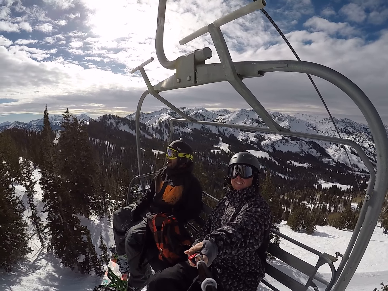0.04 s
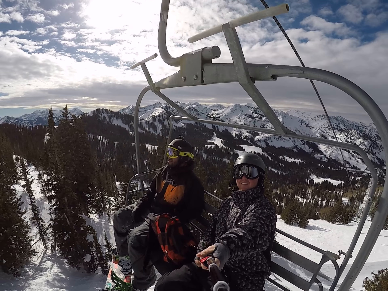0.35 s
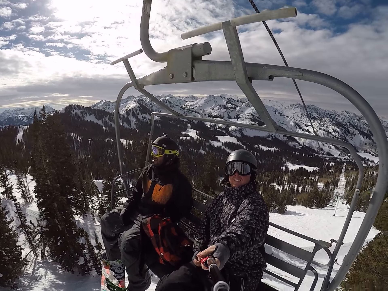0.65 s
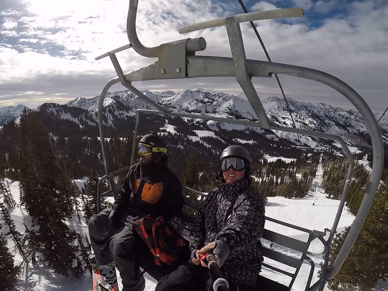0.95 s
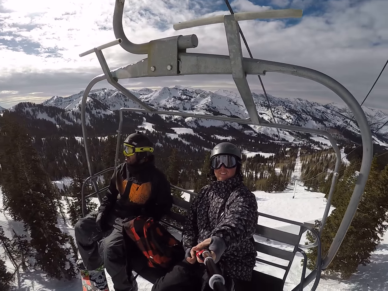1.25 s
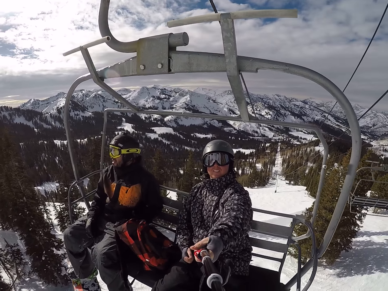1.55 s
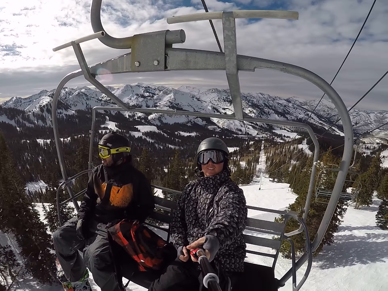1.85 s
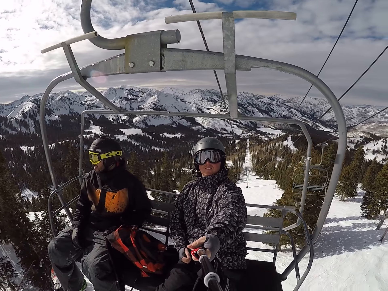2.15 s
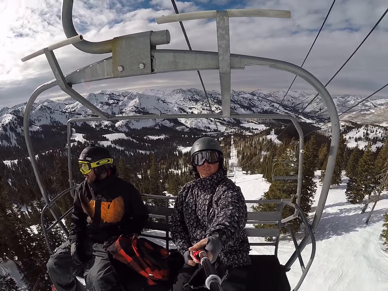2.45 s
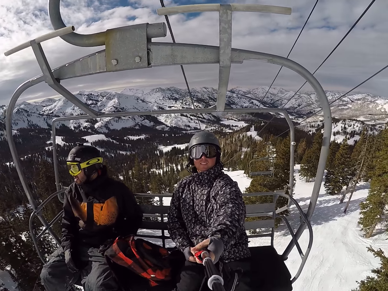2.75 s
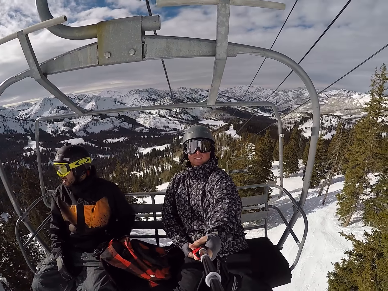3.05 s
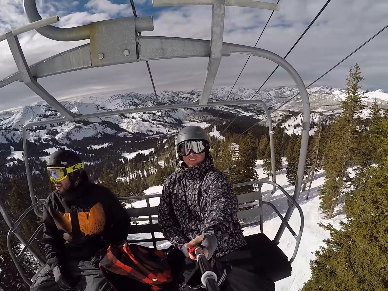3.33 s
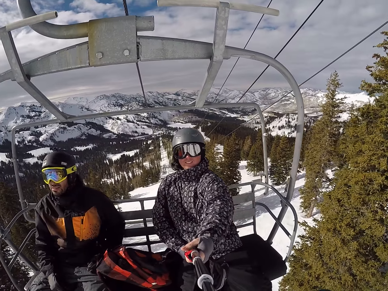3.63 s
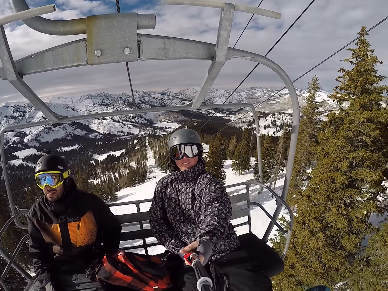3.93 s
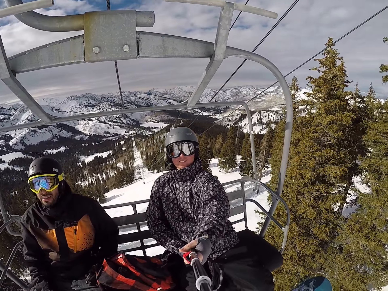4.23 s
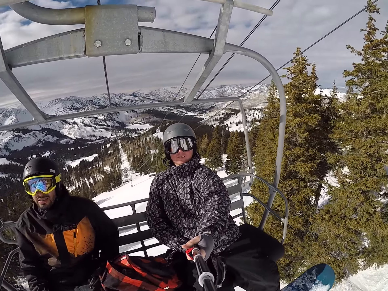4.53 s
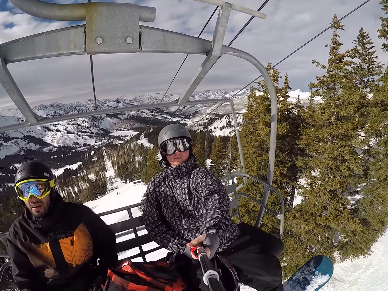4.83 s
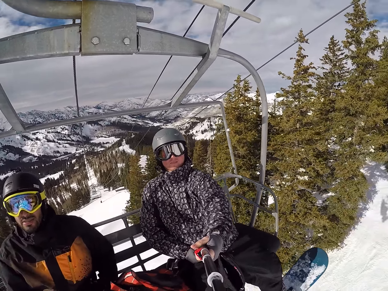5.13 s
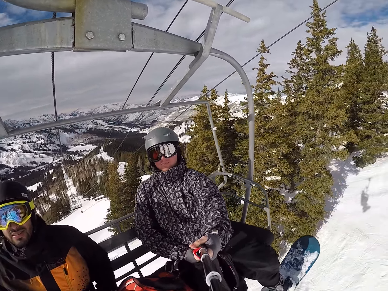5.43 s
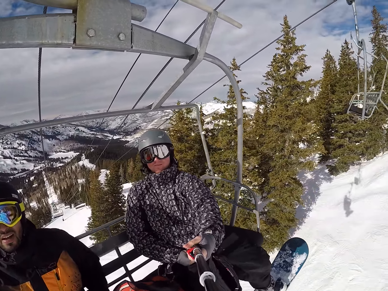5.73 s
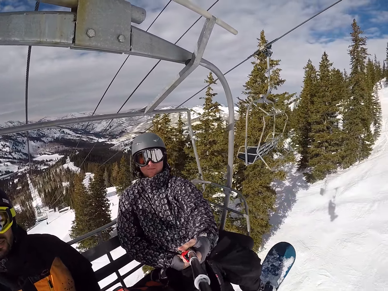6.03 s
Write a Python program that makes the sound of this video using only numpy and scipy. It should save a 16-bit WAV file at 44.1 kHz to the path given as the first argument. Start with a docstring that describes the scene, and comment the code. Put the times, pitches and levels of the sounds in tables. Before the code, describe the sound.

Low, rumbling wind on a chairlift microphone dies down to light clothing rustles, then returns in hard, choppy gusts.

```python
"""A camera on a pole rides a chairlift through a mountain wind.
At first a breeze sweeps eddies over its two microphone ports, while ski jackets swish and tick.
By 2 s the wind has died down, and cloth rubbing on cloth stands out in the lull.
From 4 s hard gusts return, with hoarse rips off the port edges and thuds from the camera body.
Throughout lie the deep rumble of large eddies, the hiss of open air and a thin electronic whine."""
import sys
import numpy as np
from scipy import signal
from scipy.fft import rfft, irfft
from scipy.io import wavfile
from scipy.ndimage import uniform_filter1d

SR = 44100
rng = np.random.default_rng(int(sys.argv[2]) if len(sys.argv) > 2 else 0)


def unload_audio(sound):
    """Save the sound as a 16-bit wav file, at the path given as the first command line argument."""
    columns = np.transpose(np.atleast_2d(sound))
    # keep every value between -1 and 1, then stretch to whole-number steps
    steps = np.round(np.clip(columns, -1, 1) * 32767)
    wavfile.write(sys.argv[1], SR, steps.astype(np.int16))


N = 276948
TIME, HZ = np.arange(N) / SR, np.fft.rfftfreq(N, 1 / SR)
BREEZE_DB = -29.5  # reference strength of the flow
SPLIT = np.array([[.5], [-.5]])  # shares a difference between left and right

# airflow over the ports, a breeze, a lull, a hard blow: (time [s], strength [dB])
FLOW_STRENGTH = [(0, -30.5), (0.35, -30), (0.6, -34), (0.75, -31.5), (1.1, -32.5), (1.55, -35.5),
                 (1.85, -40.5), (2.7, -44), (3.6, -42), (4.0, -44), (4.3, -41), (4.65, -36), (4.9, -32.5),
                 (5.1, -32.5), (5.35, -28), (5.8, -30.5), (6.1, -29), (6.28, -35)]
# likeness of airborne sound at the two ports: (frequency [Hz], correlation [clipped to -1..1])
AIRBORNE_CORRELATION = [(100, 16), (350, 0.3), (600, 0.18), (900, -0.32), (1300, -0.05), (1800, 0.3),
                        (2600, 0.34), (3700, 1), (5500, 0.5), (9000, -0.09)]
# phase difference of airborne sound between the ports: (frequency [Hz], left lead [rad])
AIRBORNE_PHASE = [(400, 0.28), (900, 0.05), (1300, -0.2), (1800, -0.7), (2700, -0.5), (4000, -1),
                  (6000, -1.37), (9000, -3.5)]


def buffeting(level_db=-1.5, breeze_corner_hz=376, quickening=0.78, sharpening=0.073, build_turns=1.75):
    """Convected turbulence: a stronger flow presses harder and sweeps faster eddies past the ports."""
    # single gusts: (time [s], added strength [dB], half-length [s], left minus right [dB])
    gusts = [(0.024, 4, 0.032, 1), (0.731, 5, 0.036, 9.5), (0.877, 3, 0.016, 12), (0.946, 1, 0.021, 11),
             (1.09, 2.5, 0.0073, 10), (1.142, 7, 0.037, 10), (1.392, 2.5, 0.028, 0.5),
             (1.676, 6.5, 0.037, 10.5), (2.198, -3.5, 0.033, 18), (2.405, 6.5, 0.011, 10),
             (3.936, 6, 0.027, 2), (4.039, 15, 0.0083, 16), (4.134, 7.5, 0.036, -8),
             (4.205, 9.5, 0.028, 12), (4.411, 12.5, 0.025, 8.5), (4.51, 12.5, 0.012, 8.5),
             (4.555, 10.5, 0.012, -2), (4.635, 3.5, 0.011, 6), (4.742, 6.5, 0.01, -3),
             (4.82, 5, 0.041, 2.5), (4.894, 6.5, 0.02, 7), (4.955, 1.5, 0.0088, 1.5),
             (4.98, 9, 0.023, -6.5), (5.019, 13, 0.0075, -1.5), (5.274, 5, 0.022, 2),
             (5.356, 4.5, 0.015, 9), (5.417, 4.5, 0.012, -2), (5.513, 3.5, 0.0054, -9),
             (5.594, 4, 0.012, -4), (5.626, 5, 0.0044, 11), (5.638, 6.5, 0.0062, -3.5),
             (5.671, 4, 0.0068, -3.5), (5.692, 2.5, 0.007, 7), (5.702, 6.5, 0.0064, -6),
             (5.771, 6, 0.009, -11), (5.839, 7.5, 0.0041, -22), (5.859, 7, 0.0049, -9),
             (5.902, 7, 0.0069, 7), (5.977, 7.5, 0.0057, -14), (6.084, 8, 0.046, 4), (6.135, 7, 0.0052, -2),
             (6.204, 11, 0.014, 5.5)]
    # brief slack in the flow: (time [s], added strength [dB], half-length [s])
    lulls = [(0.61, -3.5, 0.011), (1.327, -2.5, 0.015), (1.497, -3.5, 0.049), (4.67, 0, 0.014),
             (5.052, -3, 0.053), (5.812, -4.5, 0.014), (5.938, -2.5, 0.016)]
    # eddies get heavier as the camera swings into the flow:
    # (time [s], slope [dB/octave], frequency of the slowest eddies [Hz])
    heading = [(0, -2, 140), (1.1, -0.2, 82), (2.2, -4, 64), (3.5, 1.5, 80), (4.4, -2.5, 53.3),
               (6.28, -1.5, 57)]
    # the ports share slow eddies in step, faster ones opposed: (frequency [Hz], correlation [-1..1])
    port_correlation = [(60, 0.33), (130, 0.42), (250, -0.28), (450, -0.58), (800, -0.94), (1300, -0.64),
                        (2500, 0.36)]
    # balance of the eddies: (frequency [Hz], left minus right [dB])
    port_balance = [(50, -7.5), (90, 2.5), (160, -2), (300, 0), (550, -4.5), (1200, -3.5)]
    # the port muffles the wind, gently to about 560 Hz, then steeply as eddies smaller than its
    # mouth cancel: (frequency [Hz], gain [dB])
    port_response = [(100, 1), (400, -2), (560, -2.5), (800, -5.5), (1130, -10), (1600, -17.5), (2260, -24)]

    gust_db = sum(db * bell(s, length) for s, db, length, _ in gusts)
    lull_db = sum(db * bell(s, length) for s, db, length in lulls)
    slope_db, slowest_hz = follow(heading)
    slope_db = slope_db + sharpening * gust_db
    strength_db = follow(FLOW_STRENGTH)[0] + gust_db + lull_db
    strength_db = strength_db + 0.73 * flutter(22) + 1.33 * flutter(70)  # at both ports alike
    strength_db = strength_db + 0.68 * np.array([flutter(70), flutter(70)])  # at each on its own
    corner_hz = breeze_corner_hz * gain_of(quickening * (strength_db - BREEZE_DB))
    a, b = rfft(rng.standard_normal((2, N))) / np.sqrt(HZ + 1)
    eddies = pair(a, b, read(port_correlation, HZ), read(port_balance, HZ))
    out = 0
    for hz in 25 * 2 ** (np.arange(14) / 2):  # one eddy size every half octave
        triangle = np.maximum(1 - 2 * abs(np.log2((HZ + 1) / hz)), 0)
        band = unit_rms(irfft(eddies * triangle, N))
        band = steadied(band, seconds=0.0068 + 2 / hz, amount=0.55)
        rolloff = 1 / np.sqrt((1 + (hz / corner_hz) ** 3.34) * (1 + (slowest_hz / hz) ** 5))
        # an eddy needs a turn or two to build, so slow ones miss short gusts
        felt_db = uniform_filter1d(strength_db, size=int(build_turns * SR / hz) + 1)
        band_db = felt_db + read(port_response, hz) + slope_db * np.log2(hz / 250)
        out = out + band * rolloff * gain_of(band_db)
    # the flow veers between the ports by chance, and each gust comes from its own side
    veer_db = 1.4 + 4.5 * flutter(8)
    gust_side_db = sum(db * bell(s, 1.5 * length) for s, _, length, db in gusts)
    sides = gain_of((veer_db + gust_side_db) * SPLIT)
    return out * gain_of(level_db) * sides / np.sqrt((sides ** 2).mean(0))


def rips(level_db=-2.0):
    """Flow separation: small, fast eddies break off the port edges in short, hoarse bursts."""
    # bursts: (time [s], half-length [s], relative level [dB], left minus right [dB])
    separations = [(0.734, 0.0071, -21, 3), (1.143, .02, -32, 6), (4.41, 0.0064, -16.5, 5),
                   (4.51, 0.0037, -25, -1), (4.581, 0.0023, -26, -5), (4.809, 0.0099, -19.5, 1),
                   (4.894, .003, -15, 7.5), (4.947, .003, -33, -1), (5.031, 0.0022, -16.5, 0),
                   (5.326, .004, -23, 0), (5.347, 0.012, -21.5, 4), (5.394, 0.0088, -23.5, 3),
                   (5.515, .003, -19.5, -0.5), (5.602, 0.0037, -23, -7), (5.636, .008, -19, -2),
                   (5.695, 0.0034, -27, 8), (5.715, 0.0021, -13.5, -6.5), (5.757, 0.0074, -22, -4.5),
                   (5.773, 0.006, -22, -3), (5.84, 0.004, -19, -1.5), (5.863, 0.0057, -16, -0.5),
                   (5.992, 0.0032, -17.5, -3.5), (6.031, .003, -20, 0), (6.079, 0.0036, -12, 0),
                   (6.105, 0.0028, -10.5, 1), (6.13, 0.0044, -19, 2)]
    # spectrum of a rip: (frequency [Hz], level [dB])
    spectrum = [(100, -34), (250, -4), (420, 5), (620, 3.5), (900, -7), (1250, -19), (1800, -30),
                (4000, -70)]
    colour = gain_of(read(spectrum, HZ) / 2)  # applied twice: for eddy size, then for the muffling port
    eddies = pair(noise(colour), noise(colour), correlation=-0.97)
    eddies = steadied(eddies, seconds=.005, amount=0.32)
    bursts = sum(bell(s, length) * gain_of(db + lean_db * SPLIT)
                 for s, length, db, lean_db in separations)
    return irfft(rfft(eddies * bursts) * colour, N) * gain_of(level_db)


def thuds(wander=.25, slowing=.12):
    """Vortex shedding: the camera sheds a few eddies whose uneven beat slows as the gust passes."""
    # eddy trains: (time [s], half-length [s], frequency [Hz], level [dB], left minus right [dB])
    trains = [(0.749, 0.012, 234, -32, -5), (0.894, 0.0074, 220, -29, 10), (0.957, 0.0065, 220, -28, 10),
              (1.135, 0.035, 209.4, -25.5, 11), (1.688, .01, 140.5, -22, 6), (2.196, 0.0096, 85.3, -25, 5),
              (2.405, 0.0096, 125, -29, 8), (4.411, .004, 485, -27.5, 6), (4.42, 0.011, 235.5, -15.5, 12.5),
              (4.511, 0.0051, 258, -27, 8), (5.345, 0.016, 156.3, -16.5, 22),
              (5.412, 0.04, 89.36, -15.5, 10), (5.42, 0.0059, 260.6, -21.5, -6),
              (5.634, 0.0095, 228.8, -18, -7), (5.667, .005, 200, -18, -12),
              (5.866, 0.0071, 294.3, -20, 11), (5.893, .005, 291, -15, 1), (6.09, 0.012, 95.9, -13, 6),
              (6.203, 0.0089, 232.2, -24, 13)]
    out = 0
    for s, length, hz, db, lean_db in trains:
        progress = np.clip((TIME - s) / length, -3, 3)
        beat_hz = hz * np.exp(wander * flutter(45) - slowing * progress)
        turns = np.cumsum(beat_hz) / SR + rng.random((2, 1))
        out = out + np.sin(2 * np.pi * turns) * bell(s, length) * gain_of(db + lean_db * SPLIT)
    return out


def rumble(level_db=-28.0, swell_db=1.6):
    """Coherent pressure: eddies larger than the camera push on both ports at once, in surges."""
    # spectrum of the large eddies: (frequency [Hz], level [dB])
    spectrum = [(10, -38), (20, -1), (30, -4.5), (38, 9), (48, 0), (62, -3), (80, -13), (120, -22.5),
                (200, -44), (400, -56), (2000, -100)]
    # big slow eddies passing: (time [s], added level [dB], half-length [s])
    surges = [(0.22, 5.5, 0.064), (0.543, 3.5, 0.059), (0.702, 10.5, 0.015), (1.203, 6.5, 0.23),
              (1.689, 14.5, 0.0062), (1.923, 7, 0.042), (2.198, 12, 0.013), (2.493, 5, 0.064),
              (2.943, 2.5, 0.15), (3.422, 8, 0.077), (4.477, 12.5, 0.03), (5.113, 9, 0.13), (5.56, 7, 0.03),
              (6.014, 8, 0.03)]
    colour = gain_of(read(spectrum, HZ))
    push = pair(noise(colour), noise(colour), correlation=0.99, lean_db=-3.0)
    surge_db = sum(db * bell(s, length) for s, db, length in surges) + swell_db * flutter(5)
    return steadied(push, seconds=0.107, amount=1.0) * gain_of(level_db + surge_db)


def jackets(level_db=7.0, grain_db=1.0, stir_db=-54, wind_share=0.8, trail=1.55):
    """Sliding friction: cloth moves on cloth in tiny catches, stirred by the wind and in strokes."""
    # spectrum of sliding cloth: (frequency [Hz], level [dB])
    spectrum = [(150, 18), (350, 9), (800, 13), (1200, 7), (1800, 7), (2600, 0.5), (3400, 2.5), (4300, 2),
                (5100, -1), (6100, -1), (7300, -11.5), (10000, -19), (12000, -35), (15000, -48)]
    # strokes: (peak time [s], half-length [s], relative level [dB], brightness [dB/octave])
    strokes = [(0.043, 0.08, -56.5, -3), (0.335, 0.078, -55, 0), (0.62, 0.065, -52.5, -2.5),
               (0.78, 0.05, -51, 1.5), (0.91, 0.027, -46.5, 2), (0.994, 0.061, -47.5, -0.5),
               (1.08, 0.084, -48.5, -3), (1.494, 0.053, -52.5, -1), (1.765, 0.03, -50.5, 3),
               (1.98, 0.04, -55, 1), (2.288, 0.022, -51, 5), (2.62, 0.037, -54, -4.5),
               (2.73, 0.06, -53.5, -2), (3.74, 0.028, -52, 4.5), (4.25, 0.024, -53.5, 2),
               (4.478, .04, -56, -3), (5.2, 0.076, -55, 0)]
    _, t, friction = signal.stft(airborne(spectrum), SR, nperseg=512)
    hz = np.fft.rfftfreq(512, 1 / SR)[:, None]
    octaves = np.log2(np.clip(hz, 1500, 9000) / 3800)
    wind_db = follow(FLOW_STRENGTH, t)[0] - BREEZE_DB
    power = gain_of(stir_db + wind_share * wind_db - 4.0 * octaves) ** 2
    for s, length, db, bright_db in strokes:
        swell = bell(s, length * np.where(t < s, 1, trail), t)  # rises quickly, trails off
        power = power + (gain_of(db + bright_db * octaves) * swell) ** 2
    swish = signal.istft(friction * np.sqrt(power), SR, nperseg=512)[1][:, :N]
    return swish * gain_of(level_db + grain_db * flutter(160))


def scrapes(level_db=6, attack_s=0.0027):
    """Stick-slip friction: stiff cloth catches, lets go at once and rasps to rest."""
    # slips: (start time [s], decay [s], relative level [dB], brightness [dB/octave])
    slips = [(1.468, 0.054, -60, -5), (1.727, 0.11, -56.5, -2), (2.55, 0.04, -51, 5),
             (2.584, .07, -50, 1.5), (2.706, 0.029, -53, 9)]
    # spectrum of the rasp: (frequency [Hz], level [dB])
    spectrum = [(300, -3), (1000, 3), (2000, 4), (3300, 4.5), (6000, -2), (7600, -2), (8600, -20),
                (10500, -16), (12000, -34), (15000, -45)]
    octaves = np.log2(np.clip(HZ, 1500, 11000) / 3800)
    out = 0
    for s, decay_s, db, bright_db in slips:
        rasp = irfft(rfft(airborne(spectrum)) * gain_of(bright_db * octaves), N)
        age = np.maximum(TIME - s, 0)
        out = out + rasp * gain_of(db) * onset_decay(age, attack_s, decay_s)
    return out * gain_of(level_db)


def zips(grain_db=3.5):
    """Periodic friction: the weave of one taut fold ripples over another and sings in a narrow band."""
    # slides: (time [s], half-length [s], centre frequency [Hz], half-width [Hz], level [dB])
    slides = [(1.005, 0.05, 4200, 850, -51), (1.18, .03, 5900, 300, -61), (1.505, 0.04, 2280, 800, -49.5),
              (1.786, 0.045, 5800, 450, -56), (1.795, 0.052, 4400, 160, -62)]
    out = 0
    for s, length, hz, width_hz, db in slides:
        band = bell(hz, width_hz, HZ)
        ripple = pair(noise(band), noise(band), read(AIRBORNE_CORRELATION, hz))
        out = out + ripple * gain_of(db) * bell(s, length)
    return out * gain_of(grain_db * flutter(120))


def sleeve(peak_s=2.61, half_length_s=0.2, level_db=-44.5):
    """Broadband friction noise: one slow, soft rub of a sleeve swells and fades."""
    # spectrum of the rub: (frequency [Hz], level [dB])
    spectrum = [(100, -31), (280, 7), (500, 6.5), (900, -3), (1700, -4), (2800, -34), (6000, -14),
                (10000, -46), (13000, -36), (15000, -50)]
    return airborne(spectrum) * bell(peak_s, half_length_s) * gain_of(level_db)


def ticks(attack_s=0.00032, detune=0.058):
    """Damped free vibration: gear and folds of cloth snap and ring, each at a slightly different pitch."""
    # snaps: (time [s], level [dB])
    snaps = [(0.1987, -28.5), (0.2578, -35), (0.2912, -30), (0.314, -35), (1.5163, -37), (1.529, -34),
             (2.367, -41), (2.658, -34.5)]
    # modes of a snap: (frequency [Hz], relative level [dB], decay [s])
    modes = [(1560, -4, 0.0027), (2440, -3, 0.00089), (3500, 3.5, .0006), (4140, -1, 0.00046),
             (6090, -11, .0006)]
    out, age = np.zeros((2, N)), np.arange(1024) / SR
    for s, db in snaps:
        start = round(s * SR)
        for hz, mode_db, decay_s in modes:
            detuned_hz = hz * np.exp(detune * rng.standard_normal())
            ring = np.sin(2 * np.pi * detuned_hz * age + read(AIRBORNE_PHASE, hz) * SPLIT)
            envelope = gain_of(db + mode_db) * onset_decay(age, attack_s, decay_s)
            out[:, start:start + len(age)] += ring * envelope
    return out


def open_air(waver_db=0.58):
    """Ambient noise: the smooth, broadband hiss of the open slope."""
    # spectrum of the hiss: (frequency [Hz], level [dB])
    spectrum = [(60, -0.5), (200, 5), (350, 2.5), (600, -3), (1000, -2), (1480, -6), (1750, -6), (2100, -9),
                (2700, -12.5), (4000, -16), (5200, -17.5), (7000, -18.5), (8500, -22.5), (10300, -22.5),
                (12500, -32), (14800, -40)]
    # slow drift of the hiss: (time [s], level [dB])
    levels = [(0, -45.5), (1.2, -45.5), (1.55, -43.5), (1.68, -47), (1.85, -45), (2.4, -43), (2.65, -42.5),
              (3.1, -44), (3.7, -45), (5.4, -44.5), (6.28, -46)]
    return airborne(spectrum) * gain_of(follow(levels)[0] + waver_db * flutter(26))


def whine(hz=7790, wander_hz=55, frame_hz=59.94, throb=0.76, left_db=-77, right_db=-62.5):
    """Amplitude modulation: a thin, wavering electronic tone throbs at the camera's frame rate."""
    # swell of the whine: (time [s], relative level [dB])
    levels = [(0, -13), (.6, -9), (1.3, -5), (2, -4), (6.05, 0), (6.28, -7)]
    turns = np.cumsum(hz + wander_hz * flutter(90)) / SR
    tone = np.sin(2 * np.pi * turns) * (1 + throb * np.cos(2 * np.pi * frame_hz * TIME))
    return unit_rms(tone) * gain_of(np.array([[left_db], [right_db]]) + follow(levels)[0])


def airborne(spectrum):
    """Spaced receivers: noise of rms 1 reaches the ports partly correlated, apart in phase and level."""
    # balance of airborne sound: (frequency [Hz], left minus right [dB])
    balance = [(300, 0), (900, 0), (1300, -4.5), (2100, 1), (3200, 0), (5500, 1), (7500, -2), (9000, -4),
               (13000, 0)]
    a, b = rfft(rng.standard_normal((2, N)))
    ports = pair(a, b, read(AIRBORNE_CORRELATION, HZ), read(balance, HZ))
    phase_shift = np.exp(1j * read(AIRBORNE_PHASE, HZ) * SPLIT)
    return unit_rms(irfft(ports * gain_of(read(spectrum, HZ)) * phase_shift, N))


def pair(a, b, correlation, lean_db=0):
    """Sum and difference: two independent noises make left and right of given likeness and balance."""
    correlation = np.clip(correlation, -1, 1)
    common, opposed = a * np.sqrt((1 + correlation) / 2), b * np.sqrt((1 - correlation) / 2)
    return np.array([common + opposed, common - opposed]) * gain_of(lean_db * SPLIT)


def noise(gain):
    """Spectral shaping: white noise filtered by the given gain, at rms 1."""
    return unit_rms(irfft(rfft(rng.standard_normal(N)) * gain, N))


def flutter(rate_hz):
    """Random modulation of rms 1, up to about rate_hz."""
    return noise(np.exp(-(HZ / rate_hz) ** 2) * HZ / (HZ + rate_hz / 2))


def steadied(x, seconds, amount):
    """Envelope compression: evens out the chance swelling of a stereo noise, at rms 1."""
    power = uniform_filter1d((x ** 2).mean(0), size=int(seconds * SR) + 1)
    return unit_rms(x / (abs(power) + 1e-12) ** (amount / 2))


def bell(centre, half_length, axis=TIME):
    """Gaussian swell to 1; the half-length is its standard deviation."""
    return np.exp(-.5 * ((axis - centre) / half_length) ** 2)


def onset_decay(age, attack_s, decay_s):
    """Exponential damping with a linear onset."""
    return np.minimum(age / attack_s, 1) * np.exp(-age / decay_s)


def read(points, hz):
    """Interpolates a table on a log-frequency axis."""
    f, value = np.transpose(points)
    return np.interp(np.log(hz + 1), np.log(f + 1), value)


def follow(rows, t=TIME):
    """Interpolates each column of a curve at the times t."""
    s, *columns = np.transpose(rows)
    return [np.interp(t, s, c) for c in columns]


def gain_of(db):
    """Decibels to amplitude."""
    return 10 ** (np.asarray(db) / 20)


def unit_rms(x):
    """Normalises to rms 1."""
    return x / np.sqrt(np.mean(x ** 2) + 1e-20)


def scene():
    """Superposition: wind on the ports adds to the quiet sounds of the ride."""
    wind = buffeting() + rips() + thuds() + rumble()
    clothing = jackets() + scrapes() + zips() + sleeve() + ticks()
    return wind + clothing + open_air() + whine()


def record(dry, ceiling=0.6, fade_s=.003, cutoff_hz=14800):
    """Soft saturation rounds the hardest gusts; a brief closing fade and a low-pass filter follow."""
    rounded = dry / (1 + (dry / ceiling) ** 4) ** (1 / 4)
    faded = rounded * np.minimum(TIME[::-1] / fade_s, 1)
    low_pass = signal.firwin(511, cutoff_hz, window=("kaiser", 9), fs=SR)
    return signal.oaconvolve(faded, low_pass[None], "same")


dry = scene()
out = record(dry)
unload_audio(out)
```